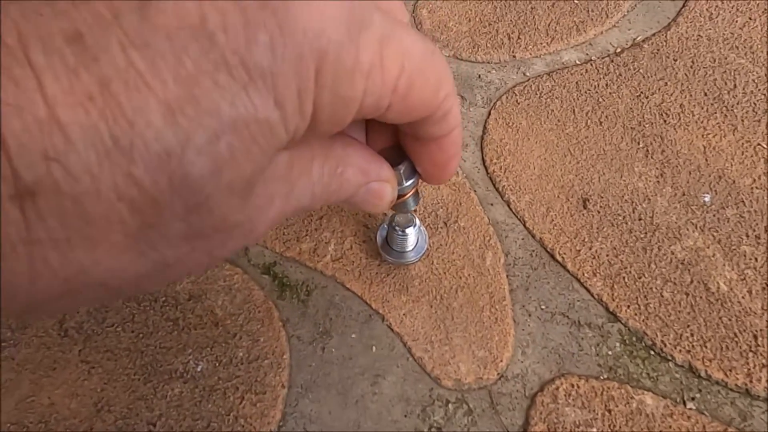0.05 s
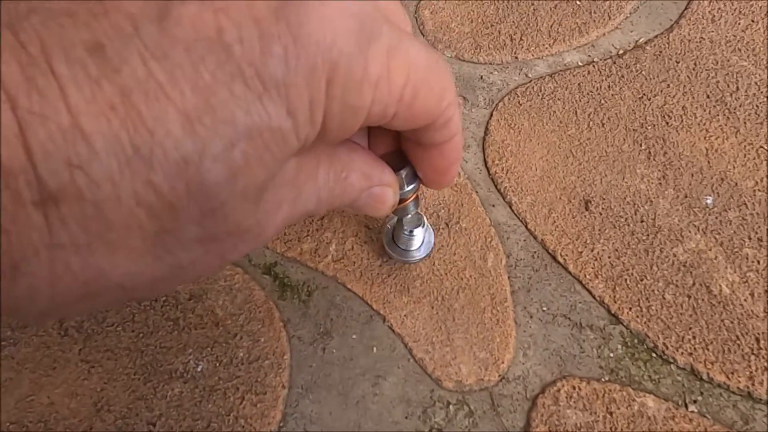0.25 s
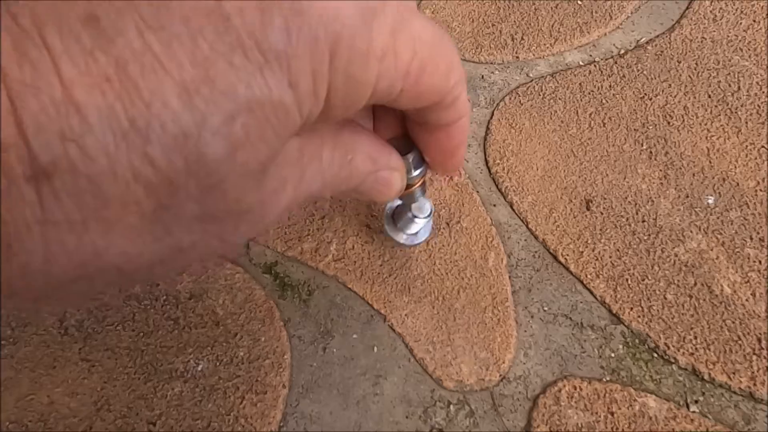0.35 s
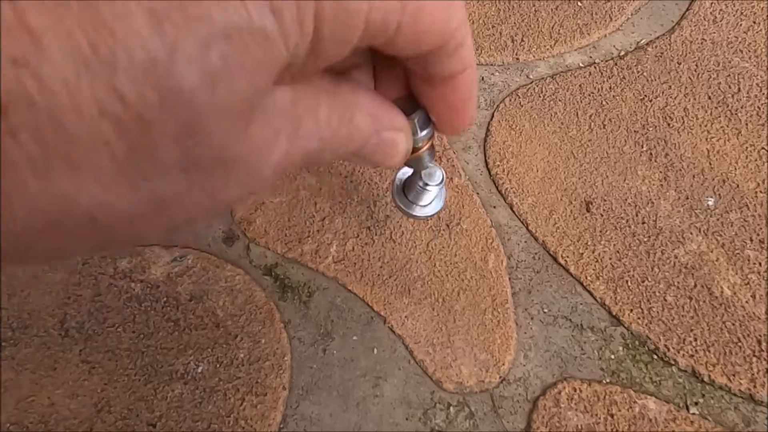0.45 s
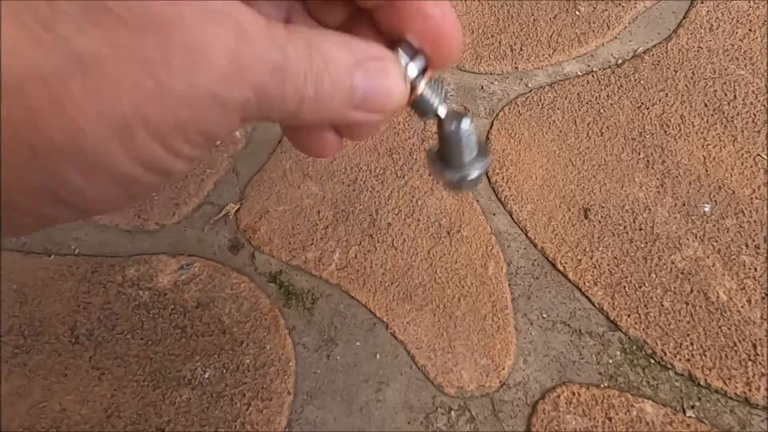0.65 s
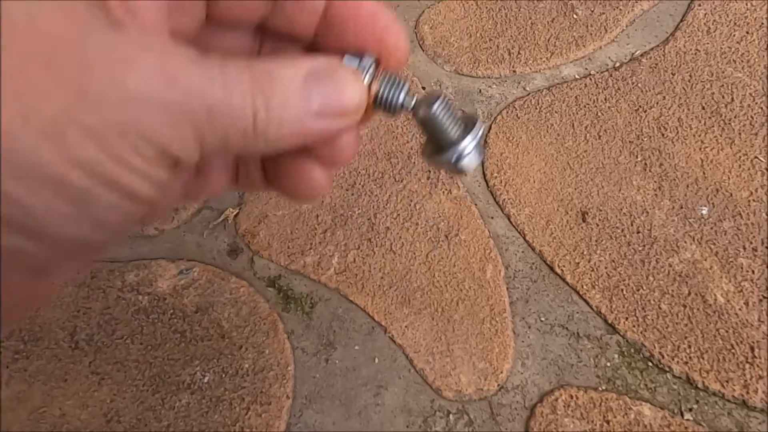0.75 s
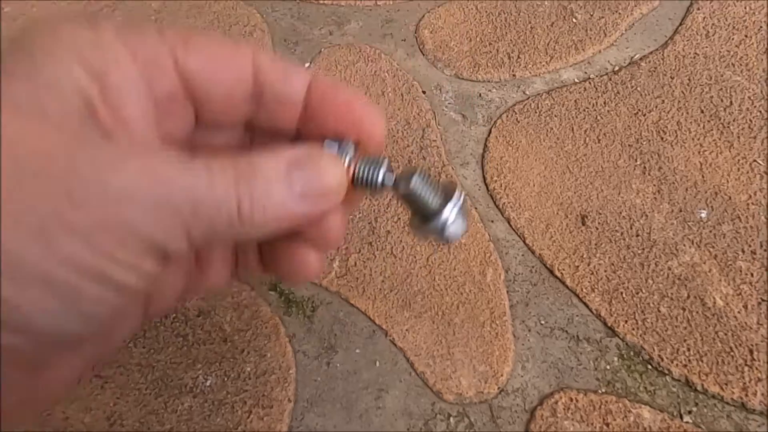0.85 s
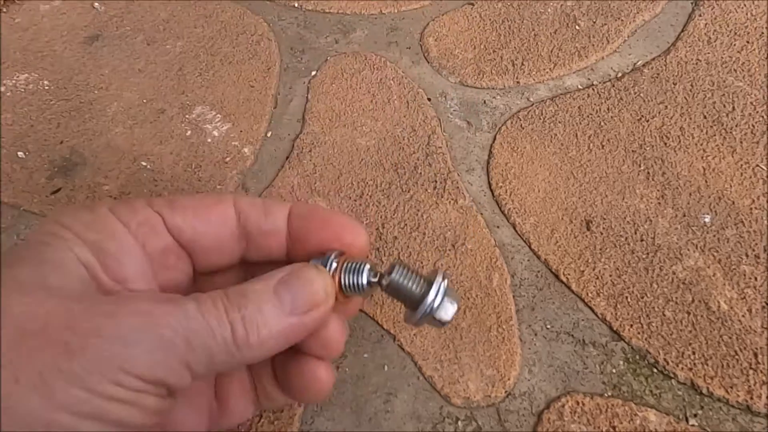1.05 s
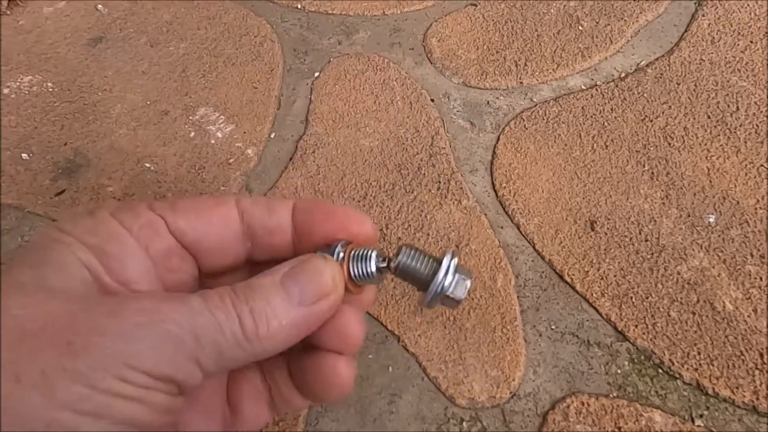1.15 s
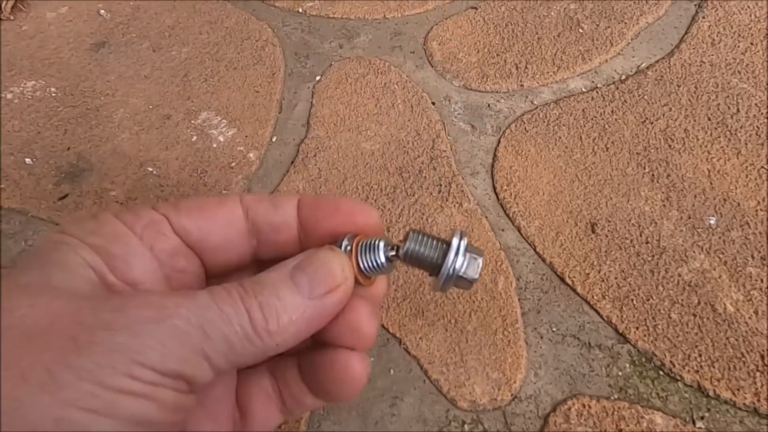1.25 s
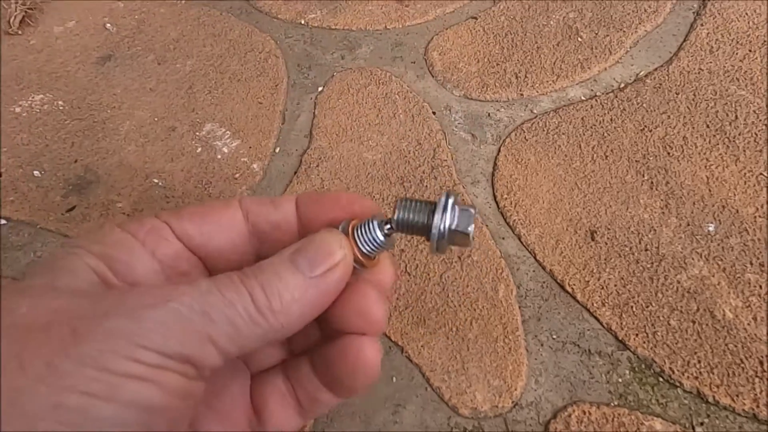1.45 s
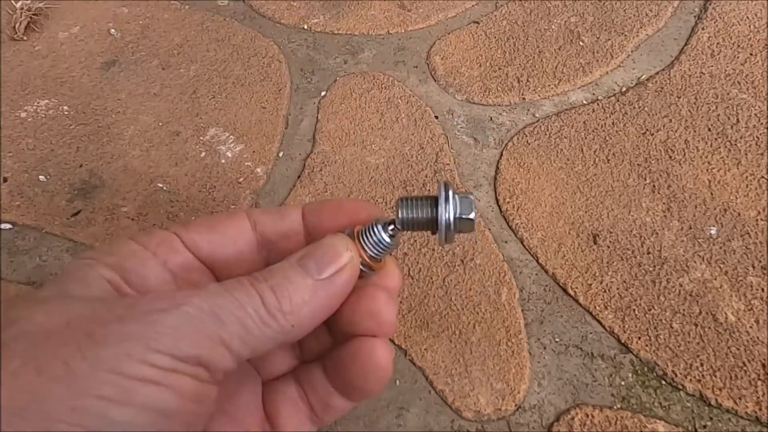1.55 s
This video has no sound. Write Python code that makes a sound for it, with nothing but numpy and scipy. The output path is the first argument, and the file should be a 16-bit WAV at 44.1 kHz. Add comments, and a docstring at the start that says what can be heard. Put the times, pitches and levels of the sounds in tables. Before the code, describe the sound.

A small steel bolt snaps onto a magnet at about 0.23 seconds: a loud, sharp metallic click, several contacts within milliseconds, finger-damped ring and short patio reflection. Faint raspy chirps come before it; afterwards birds whistle and chirp from 0.4 to 1.0, brightest near 0.8, with a softer call around 1.3. Low distant traffic, a wavering engine hum and soft airy hiss continue throughout.

```python
"""Bolt snapping onto a magnet in a yard

A steel bolt jumps onto a hand-held magnet above a stone patio: broadband cracks within milliseconds
excite damped sine modes, then noise responses give a wall slap and the tail of the yard.
Birds are gliding harmonic whistles with rasp and garden scattering.
Beneath lie spectrally shaped outdoor noise and the wavering orders of a distant engine."""
import sys
import numpy as np
from scipy import signal
from scipy.fft import rfft, irfft
from scipy.io import wavfile

SR = 44100
rng = np.random.default_rng(int(sys.argv[2]) if len(sys.argv) > 2 else 0)


def to_wav(sig):
    """Store sig (one row per channel, or 1-D mono) as 16-bit WAV at the path in sys.argv[1].

    Samples outside -1..1 are clipped; the rate is SR.
    """
    pcm = np.clip(np.atleast_2d(sig), -1, 1) * 32767
    pcm = np.round(pcm).astype(np.int16)
    wavfile.write(sys.argv[1], SR, pcm.T)  # frames by channels


N = 70560
TIME = np.arange(N) / SR   # s


def from_db(db):
    """Logarithmic level: 20 dB is a factor of ten in amplitude."""
    return 10 ** (np.asarray(db) / 20)


def rms_one(x):
    """Normalisation: divide by the root of the mean power."""
    return x / np.sqrt(np.mean(x ** 2) + 1e-20)


def at_hz(points, hz):
    """Interpolation along a logarithmic frequency axis."""
    f, value = np.transpose(points)
    return np.interp(np.log(np.maximum(hz, 1)), np.log(f), value)


def drift(rate):
    """Low-passed randomness: two equal poles at rate/Hz smooth white noise, scaled to rms 1."""
    pole = np.exp(-2 * np.pi * rate / SR)
    white = rng.standard_normal(2 * N)
    smooth = signal.lfilter([1], [1, -2 * pole, pole * pole], white)
    return rms_one(smooth[N:])   # the filter settles during the first half


def dying(start, t60):
    """Exponential decay: after a jump to 1, the level falls 60 dB in each t60."""
    decay_db = -60 * np.clip((TIME - start) / t60, 0, 4)
    return (TIME >= start) * from_db(decay_db)


def convolve(x, response):
    """Linear superposition: every sample of the sound launches a copy of the response."""
    return signal.fftconvolve(x, response)[:N]


def noise(spectrum):
    """Spectral shaping: white noise weighted at each frequency, scaled to rms 1."""
    gain = from_db(at_hz(spectrum, np.fft.rfftfreq(N, 1 / SR)))
    return rms_one(irfft(rfft(rng.standard_normal(N)) * gain))


def colour(spectrum):
    """Minimum phase: folding the cepstrum gives a causal response, here of unit energy."""
    gain = from_db(at_hz(spectrum, np.fft.rfftfreq(N, 1 / SR)))
    cepstrum = irfft(np.log(gain))
    cepstrum[1:N // 2] *= 2
    cepstrum[N // 2 + 1:] = 0
    return rms_one(irfft(np.exp(rfft(cepstrum)))) / np.sqrt(N)


def echoes(t60s, tint, delay):
    """Diffuse reverberation: dense reflections act as noise whose bands decay at their own rates."""
    edges = np.geomspace(120, 16000, 12)   # Hz
    out = 0
    for low, high in zip(edges, edges[1:]):
        hz = np.sqrt(low * high)
        band_filter = signal.butter(2, [low, high], "band", fs=SR, output="sos")
        band = signal.sosfilt(band_filter, rng.standard_normal(N))
        envelope = rms_one(dying(delay, at_hz(t60s, hz)))
        out = out + band * from_db(at_hz(tint, hz)) * envelope
    return out / np.sqrt(N)


def engine():
    """Harmonic orders: multiples of a wandering firing rate, each fading in and out."""
    # order as a multiple of the firing rate, rms level before the shared swell/dB
    orders = [(4, -63), (5, -62), (6, -58), (8, -61.5), (10, -72.5)]
    firing_hz, wander, waver_db = 26.22, 0.01, 4.5   # wander is a fraction of the rate
    phase = 2 * np.pi * np.cumsum(firing_hz * (1 + wander * drift(2.3))) / SR
    hum = 0
    for order, db in orders:
        waver = from_db(waver_db * drift(11.6))
        tone = np.sin(order * phase + 2 * np.pi * rng.random())
        hum = hum + from_db(db) * rms_one(waver * tone)
    return hum


def background():
    """Incoherent sources: far traffic rumble and an engine swell under the hiss of open air."""
    # common swell of rumble and engine: t/s, level/dB
    swell_levels = [(0, -4), (.13, 1), (.4, 1), (.65, 0), (.9, 2), (1.25, 0), (1.6, 2)]
    # spectrum of the far traffic rumble: f/Hz, relative level per Hz/dB
    rumble_spectrum = [(20, -43), (36, -22.5), (55, -7.5), (85, -9.5), (150, -1), (230, -4.5), (380, -13.5),
                       (750, -26), (2000, -52.5)]
    # spectrum of the open air: f/Hz, relative level per Hz/dB
    air_spectrum = [(100, -8.5), (450, -0.5), (750, -0.5), (1000, 3), (1350, 1.5), (1700, -4.5), (3000, -9),
                    (4500, -19), (7000, -29), (11500, -39.5), (13000, -45.5), (14500, -46)]
    rumble_db, air_db, air_waver_db = -53, -55, 0.8   # rumble level is before the swell
    swell = from_db(np.interp(TIME, *np.transpose(swell_levels)))
    rumble = from_db(rumble_db) * noise(rumble_spectrum)
    air = from_db(air_db + air_waver_db * drift(12)) * noise(air_spectrum)
    return swell * (rumble + engine()) + air


def birds():
    """Frequency modulation: harmonic whistles glide on arcs, roughened by rasp, scattered by the garden."""
    # bird notes: t/s, length/s, attack to full level/s, start f/Hz, middle f/Hz, end f/Hz, level/dB,
    # 2nd harmonic/dB, 3rd harmonic/dB (both relative to the first), rasp 0-1, direct sound gain/dB
    notes = [ (0.033, 0.085, 0.14, 3600, 3500, 3220, -56, -43, -70, 1, -1),
             (0.117, 0.051, 0.0095, 3234, 3093, 2820, -50.5, -42, -47, 0.69, 2),
             (0.24, 0.012, 0.015, 4800, 5720, 5950, -62, -35, -23, .15, 0),
             (0.381, .10, 0.01, 2504, 2802, 2856, -55.5, 4.5, -36, .7, -3),
             (0.391, .11, 0.023, 4040, 3854, 3885, -55.5, -13, -44, 1, -4.5),
             (.505, .10, 0.02, 5090, 4552, 4495, -46.5, -32, -51, 0.43, -2.5),
             (0.573, 0.062, 0.013, 2327, 2387, 2310, -60.5, -10, -22, 0.07, 9.5),
             (.635, 0.14, 0.0053, 2314, 2369, 2348, -61.5, 1, -7, 0.62, 2.5),
             (0.639, 0.1, 0.011, 2970, 2907, 2870, -64, -8.5, -40, 0.4, -1),
             (0.646, .08, 0.0098, 4030, 3900, 3745, -57.5, -30.5, -35, .8, 0.5),
             (.755, .03, .004, 4600, 5080, 5250, -47, -42, -55, .15, 5),
             (.764, 0.0228, 0.0093, 2400, 2720, 3074, -45, -8, -34, .15, 4.5),
             (.786, 0.049, 0.023, 2959, 3221, 3120, -43, -61, -51.5, .02, 13),
             (.824, .04, .006, 4200, 3870, 3770, -47, -62, -70, .04, 11),
             (0.831, 0.0255, 0.0066, 3150, 3156, 2890, -43.5, -54, -62, 0.52, 6),
             (0.884, 0.092, 0.012, 4385, 4797, 4852, -50.5, -44.5, -62, .4, -1.5),
             (1.287, 0.042, 0.012, 3510, 3740, 3590, -59.5, -42.5, -41, 0.98, 0),
             (1.313, 0.0727, 0.0078, 3250, 3134, 3176, -55, -48, -55, 0.67, 8)]
    # breath in the harsh notes: f/Hz, relative level per Hz/dB
    hiss_spectrum = [(1800, -19), (2600, -1), (5500, 8.5), (8500, -19.5), (10500, -13.5), (12500, -30)]
    # decay of the garden: f/Hz, t60/s
    garden_t60 = [(2500, .65), (3800, 0.79), (5200, 0.42), (7000, 0.98), (11000, .45)]
    # colour of the garden: f/Hz, relative level/dB
    garden_colour = [(2000, 5), (5000, 2), (12000, 0.5)]
    release_s, garden_db, garden_delay_s = 0.011, 0.5, .006
    rasp_swing, rasp_rate_hz = 0.087, 330   # rms fraction of the pitch at full rasp
    fourth_below_second_db, hiss_db, hiss_over_second_db = 34.5, -5, 24

    direct, scattered = np.zeros(N), np.zeros(N)
    hiss = from_db(hiss_db) * noise(hiss_spectrum)
    for s, length, attack, start_hz, middle_hz, end_hz, db, second_db, third_db, rasp, direct_db in notes:
        progress = np.clip((TIME - s) / length, 0, 1)
        parabola = np.polyfit([0, .5, 1], [start_hz, middle_hz, end_hz], 2)
        pitch = np.polyval(parabola, progress) * (1 + rasp_swing * rasp * drift(rasp_rate_hz))
        phase = 2 * np.pi * np.cumsum(pitch) / SR
        harmonics = from_db([0, second_db, third_db, second_db - fourth_below_second_db])
        tone = sum(gain * np.sin(k * phase) for k, gain in enumerate(harmonics, 1))
        # the purest whistles carry the least hiss
        breath = rasp * from_db(min(second_db + hiss_over_second_db, 0)) * hiss
        rise = np.clip((TIME - s) / attack, 0, 1)
        fall = np.clip((s + length - TIME) / release_s, 0, 1)
        note = np.sqrt(2) * from_db(db) * rise * fall * (tone + breath)
        direct += from_db(direct_db) * note
        scattered += note
    garden = echoes(garden_t60, garden_colour, garden_delay_s)
    return direct + from_db(garden_db) * convolve(scattered, garden)


def bolt():
    """Impact excitation: each contact gives a crack and a rattle and starts the damped steel modes."""
    # the bolt hits and chatters: t/s, relative level/dB
    contacts = [(0.22722, 0), (0.22912, 0), (0.23028, -4), (0.23334, -8)]
    # bolt and magnet ring, damped by the fingers: f/Hz, relative level/dB, t60/s
    modes = [(2310, -23, .04), (2636, -25, .025), (2800, -25, .025), (3214, -28, .03), (4230, -33, .03),
             (4565, -30, .025), (5228, -24, .024), (5582, -20, .02), (6080, -30, .02), (6313, -29, .025),
             (6520, -30, .025), (6872, -22, .028), (7750, -30, .018), (8635, -25, .025)]
    # spectrum of each crack: f/Hz, relative level per Hz/dB
    crack_spectrum = [(60, -41.5), (200, -19), (340, -6.5), (700, -16), (1300, -6), (1700, -20.5),
                      (2400, 3), (3700, -8), (4700, 4), (6000, 2.5), (8400, -3), (10500, -16),
                      (12500, -33.5), (14000, -44)]
    knock_db, ring_db = 0, -3.5
    rattle_db, rattle_t60_s = -22, 0.021   # fine chatter as the faces settle
    # band-pass around the modes: trims the low and high skirts of the sine onsets
    ring_band_hz = (1490, 9100)

    knocks, rattle, ring = np.zeros(N), 0, 0
    for s, db in contacts:
        knocks[int(s * SR)] += from_db(db)
        rattle = rattle + from_db(db) * dying(s, rattle_t60_s)
        for hz, level_db, t60 in modes:
            oscillation = np.sin(2 * np.pi * hz * (TIME - s))
            ring = ring + from_db(db + level_db) * dying(s, t60) * oscillation
    chatter = from_db(rattle_db) * rattle * rng.standard_normal(N)
    force = from_db(knock_db) * knocks + chatter
    ring_filter = signal.butter(3, ring_band_hz, "band", fs=SR, output="sos")
    trimmed_ring = signal.sosfilt(ring_filter, ring)
    return convolve(force, colour(crack_spectrum)) + from_db(ring_db) * trimmed_ring


def yard(x):
    """Early and late reflection: a slap from the nearest wall and a short diffuse tail."""
    # decay of the yard: f/Hz, t60/s
    yard_t60 = [(300, .35), (2500, 0.21), (6000, .36), (12000, .33)]
    # colour of the yard: f/Hz, relative level/dB
    yard_colour = [(200, 5), (1000, 9.5), (1700, 3), (2600, -6.5), (3300, 1.5), (4200, 6), (5500, -4),
                   (7500, -9), (10000, -7.5), (13000, 4.5)]
    slap_s, slap_db, slap_t60_s = 0.013, -15, 0.037
    yard_db, yard_delay_s = -9.5, 0.01
    slap = rms_one(rng.standard_normal(N) * dying(slap_s, slap_t60_s)) / np.sqrt(N)
    tail = echoes(yard_t60, yard_colour, yard_delay_s)
    return convolve(x, from_db(slap_db) * slap + from_db(yard_db) * tail)


def scene():
    """Sum and difference: all sources share the centre; faint hiss and echo oppose between the ears."""
    # spectrum of the side hiss: f/Hz, relative level per Hz/dB
    side_spectrum = [(100, -9.5), (6000, -1.5), (11500, 9.5), (13500, -15)]
    side_hiss_db, side_echo_db = -96.5, -36
    snap = bolt()
    centre = snap + yard(snap) + birds() + background()
    side = from_db(side_hiss_db) * noise(side_spectrum) + from_db(side_echo_db) * yard(snap)
    return centre + side * np.array([[1], [-1]])


def record(dry):
    """Saturation and band limiting: peaks are rounded, the microphone dulls treble, the top is cut."""
    ceiling = 0.53   # amplitude limit, approached smoothly
    rolloff_hz, cutoff_hz = 12500, 14500
    rounded = ceiling * dry / (ceiling ** 4 + dry ** 4) ** (1 / 4)
    dulled = signal.sosfilt(signal.butter(6, rolloff_hz, fs=SR, output="sos"), rounded)
    steep_cut = signal.cheby1(12, .1, cutoff_hz, fs=SR, output="sos")   # 0.1 dB ripple
    return signal.sosfilt(steep_cut, dulled)


dry = scene()
out = record(dry)
to_wav(out)
```